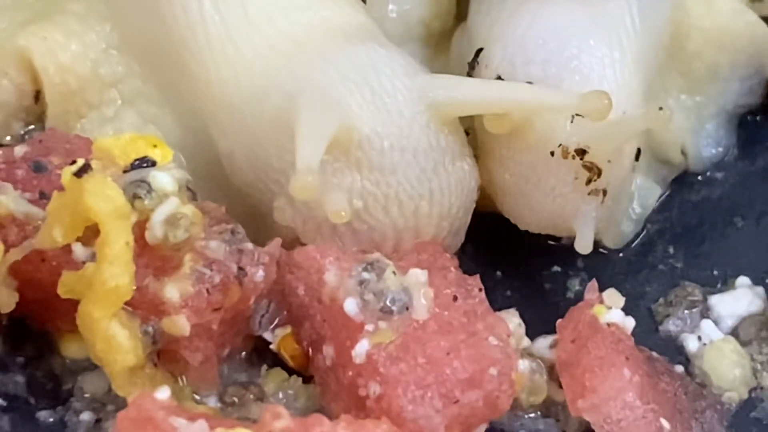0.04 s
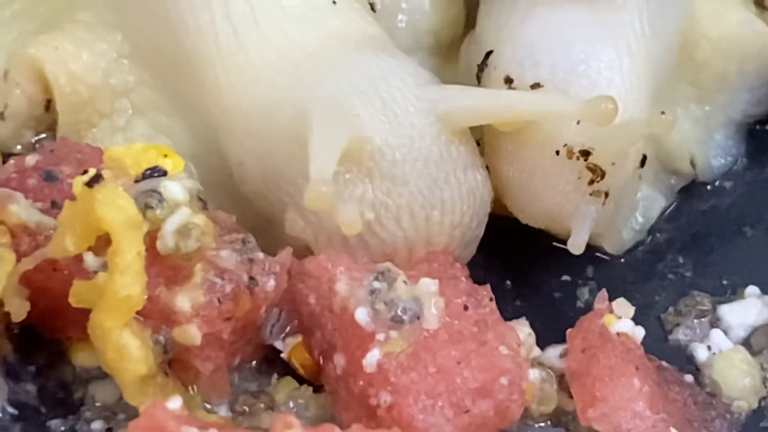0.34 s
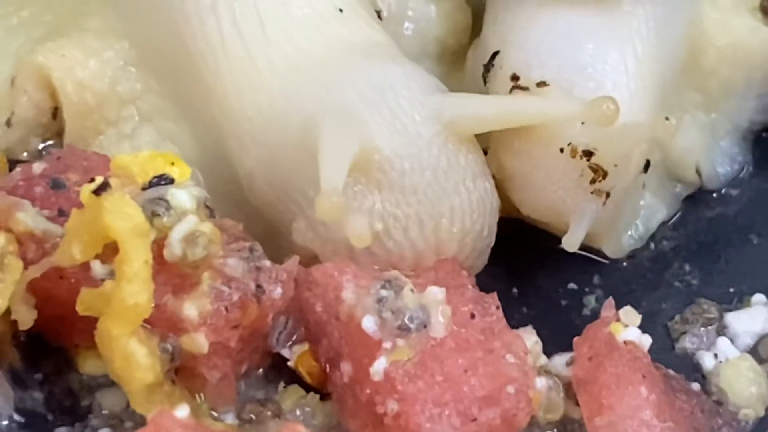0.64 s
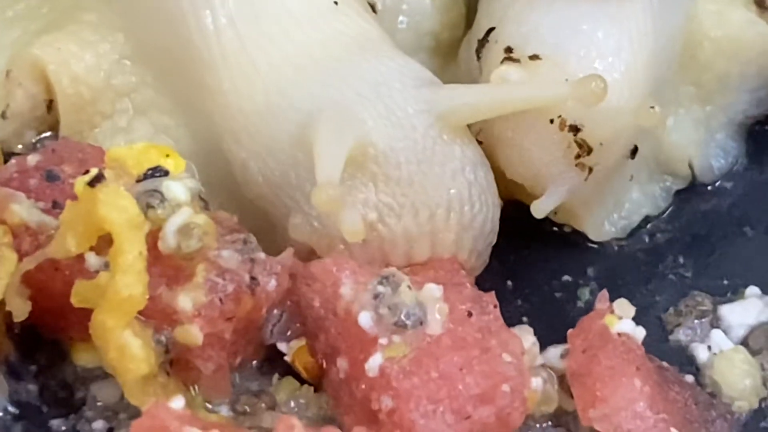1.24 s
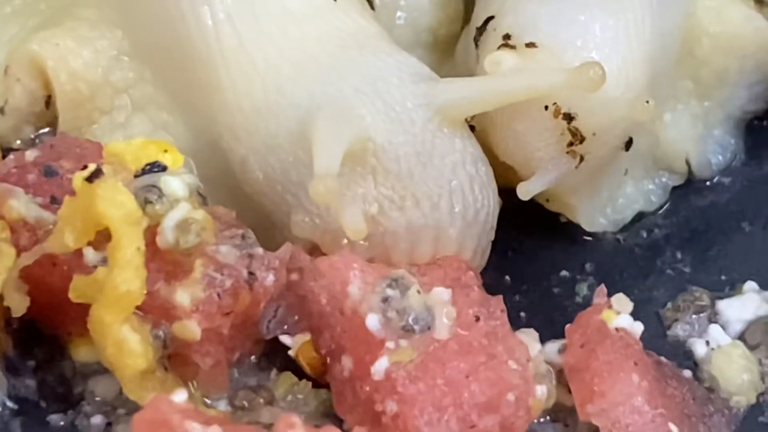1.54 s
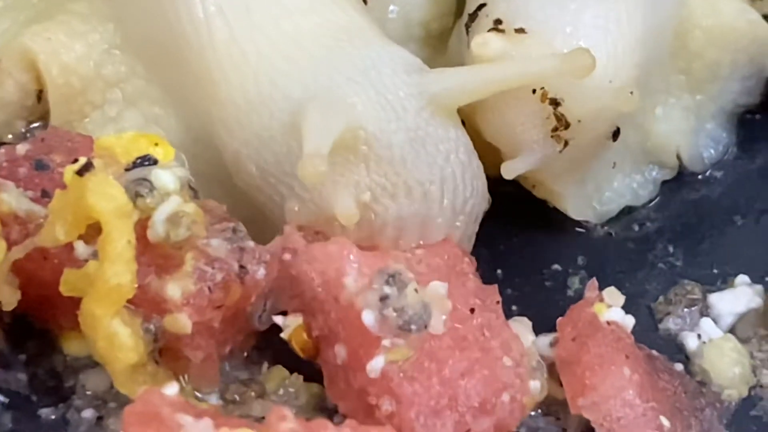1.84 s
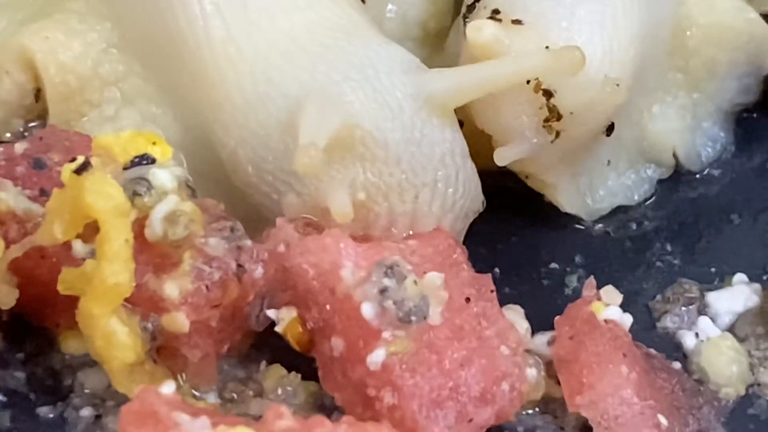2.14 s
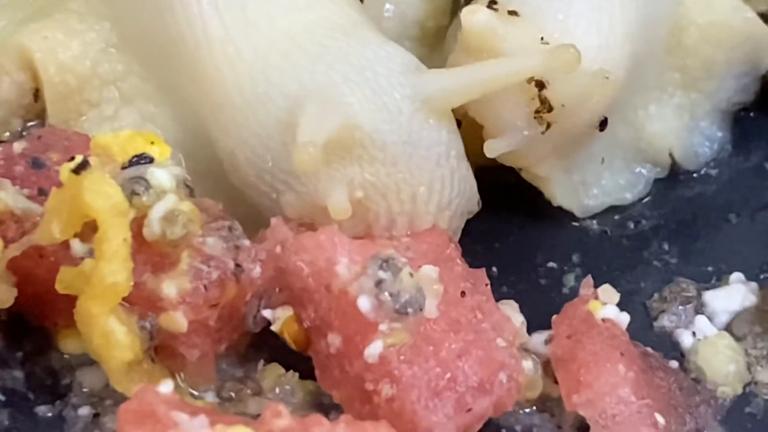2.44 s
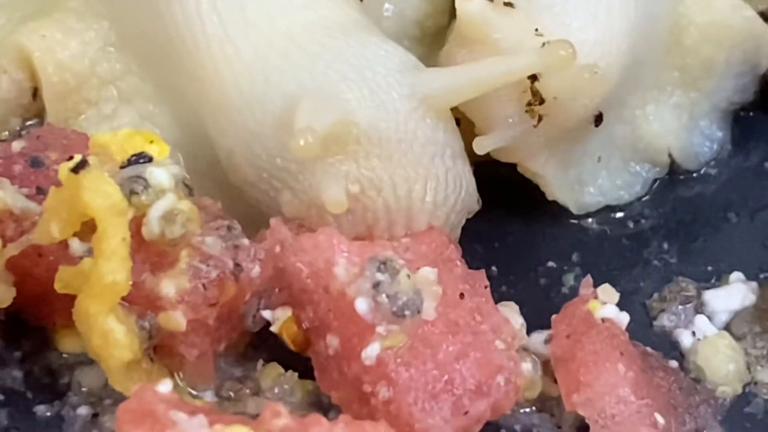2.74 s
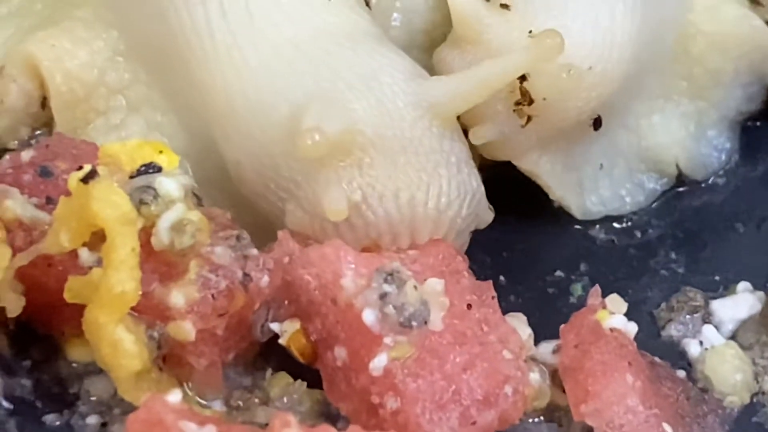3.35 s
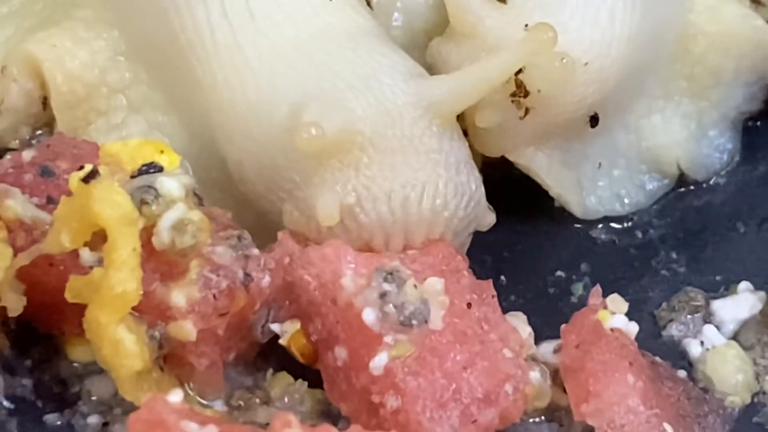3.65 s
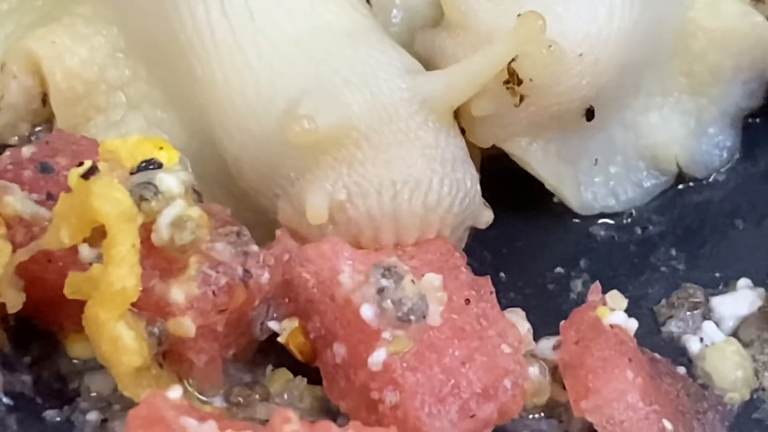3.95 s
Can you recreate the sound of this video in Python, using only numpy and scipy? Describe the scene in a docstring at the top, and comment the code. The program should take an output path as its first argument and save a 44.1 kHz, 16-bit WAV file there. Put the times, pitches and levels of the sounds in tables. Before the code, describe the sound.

A snail rasps at soft food in tiny ticks, with one wet plop over room hum.

```python
"""Snail feeding, close up

A snail rasps at soft food close to the microphone: its toothed tongue drags and snaps free in tiny
bright ticks, and the wet film sizzles. One wet plop is followed by a soft rub of its body on the left.
Behind it two motors throb against the mains hum, over dull room noise and faint microphone hiss."""
import sys
import numpy as np
from scipy import signal
from scipy.fft import rfft, irfft
from scipy.io import wavfile
from scipy.ndimage import uniform_filter1d

SR = 44100
rng = np.random.default_rng(int(sys.argv[2]) if len(sys.argv) > 2 else 0)


def store_wav(level_fs):
    """Save 16-bit WAV to argv[1]."""
    pcm = np.round(np.clip(np.atleast_2d(level_fs), -1, 1) * 32767)
    wavfile.write(sys.argv[1], SR, pcm.T.astype(np.int16))


N = 176400
T = np.arange(N) / SR
F = np.maximum(np.arange(N // 2 + 1) * SR / N, 1)


def undb(db):
    """Decibels to gain."""
    return 10 ** (np.asarray(db) / 20)


def level(x, db):
    """Set the rms level."""
    return x * undb(db) / np.sqrt(np.mean(x ** 2))


def noise():
    """White noise."""
    return rng.standard_normal(N)


def colour(x, points, turn=1):
    """Filter by (frequency [Hz], gain [dB]) points; turn=1j adds a quarter cycle at all frequencies."""
    hz, db = np.array(points).T
    gain = undb(np.interp(np.log(F), np.log(hz), db))
    return irfft(rfft(x) * turn * gain, N)


def ring(x, modes):
    """Steep resonances (centre [Hz], width [Hz], gain [dB]) that keep the power of white noise."""
    response = sum(undb(db) / (1 + 1j * (F / hz - hz / F) * hz / (1.03 * width)) ** 2
                   for hz, width, db in modes)
    return irfft(rfft(x) * response / np.sqrt(np.mean(abs(response) ** 2)), N)


def lowpass(x, hz, order=4):
    """Smooth treble cut."""
    return signal.sosfilt(signal.butter(order, hz, fs=SR, output="sos"), x)


def wander(per_s):
    """Smooth random drift with an rms of one."""
    hold = int(SR / per_s)
    steps = np.repeat(rng.standard_normal(N // hold + 1), hold)
    return level(uniform_filter1d(uniform_filter1d(steps, hold), hold)[:N], 0)


def stereo(mid, side=0, pan_db=0):
    """Left and right from mid, side and balance; positive pan is left."""
    return np.array([(mid + side) * undb(pan_db / 2), (mid - side) * undb(-pan_db / 2)])


def swell(start, length, attack, release):
    """Soft attack, hold, soft release, in seconds."""
    return (1 + np.tanh(2 * (T - start) / attack)) * (1 - np.tanh(2 * (T - start - length) / release)) / 4


# Motor and mains lines in the background (frequency [Hz], rms level at 0 dB of HUM_GAIN [dB])
HUM_LINES = [(48.47, -49), (59.37, -55), (96.96, -49), (100.04, -50), (145.4, -68), (194.5, -73),
             (283.5, -67.5)]
# Slow dip and rise of the whole hum (time [s], gain [dB])
HUM_GAIN = [(0, 2), (.35, -3), (.7, -4.5), (.95, 1), (2.5, 1), (4, 2)]
# Thin motor whine (frequency [Hz], rms level [dB])
WHINE_LINES = [(1977, -82), (2038, -86), (2410, -88), (2504, -89.5)]

def motors(in_step_s=0.98):
    """Behind the snail, motor and mains lines beat against each other under a wavering whine."""
    gain_db = np.interp(T, *np.array(HUM_GAIN).T)
    hum = sum(np.cos(2 * np.pi * hz * (T - in_step_s)) * undb(db + gain_db) for hz, db in HUM_LINES)
    whine = np.zeros(N)
    for hz, db in WHINE_LINES:
        phase = 2 * np.pi * np.cumsum(hz + 2 * wander(per_s=8)) / SR
        whine += np.sin(phase) * undb(db + 2 * wander(per_s=5))
    return stereo(np.sqrt(2) * (hum + whine))


# Spectra of the room tone, mid and side, and of its rumble (frequency [Hz], relative level [dB])
ROOM_MID = [(76, -44.5), (130, 0.5), (154, 3), (174, -1), (196, -2.5), (255, -4), (288, -1.5), (375, -6.5),
            (406, -4.5), (502, -11.5), (581, -9.5), (681, -12.5), (830, -13.5), (899, -15), (1220, -19.5),
            (1360, -19.5), (1670, -17.5), (1890, -22.5), (2040, -19), (2300, -23.5), (2490, -30),
            (2770, -34), (3080, -35), (4000, -54), (6780, -120)]
ROOM_SIDE = [(18, -41), (30, -18.5), (53, -1.5), (103, -8.5), (214, -15), (250, -18), (286, -14.5),
             (472, -14), (510, -15.5), (1930, -24.5), (3000, -48.5), (3900, -49.5), (6600, -120)]
RUMBLE = [(12, -24), (24, -15.5), (40, -4), (58, 5.5), (78, -5.5), (118, -3), (140, -12), (200, -39),
          (600, -120)]
# Lean of the room tone at the microphone (frequency [Hz], left over right [dB])
ROOM_BALANCE = [(200, 0.5), (450, 3.5), (700, 1.5), (950, 5), (1250, 1), (1700, 6), (2300, 1), (2800, 0)]

def room():
    """Wide, dull room tone that leans to the left, with a rumble in the centre."""
    mid = level(colour(noise(), ROOM_MID), -54)
    side = level(colour(noise(), ROOM_SIDE), -58.5)
    left = colour(mid + side, [(hz, db / 2) for hz, db in ROOM_BALANCE])
    right = colour(mid - side, [(hz, -db / 2) for hz, db in ROOM_BALANCE])
    rumble = level(colour(noise(), RUMBLE), -47.5)
    return lowpass(np.array([left, right]), hz=3540, order=10) + stereo(rumble)


# Self-noise of the microphone, mid and side (frequency [Hz], relative level [dB])
HISS_MID = [(2600, -21.5), (3300, 12), (3800, 1.5), (4500, -2.5), (6000, -3), (7700, -7), (8550, -16.5),
            (9300, -8), (10100, -3), (11200, -10.5), (12000, -19), (13200, -29.5)]
HISS_SIDE = [(4500, -46.5), (6200, -27), (7500, -1), (8600, 7), (10000, -9.5), (11500, 5.5), (12500, 0),
             (13300, -22)]

def hiss():
    """One faint microphone hiss, shifted in phase between the channels."""
    source = noise()
    mid = level(colour(source, HISS_MID), -84)
    side = level(colour(source, HISS_SIDE, turn=1j), -95.5)
    return stereo(mid, side)


# Drags of the tongue, close up (start [s], length [s], body level [dB], treble over body [dB])
TONGUE_DRAGS = [(1.024, 0.047, -81, -0.5), (1.613, 0.072, -81.5, -3.5), (1.724, 0.057, -81.5, -4.5),
                (1.783, 0.07, -81, -8), (1.855, .045, -85, 0), (1.951, .10, -76.5, -4),
                (2.055, 0.18, -88, -13), (2.382, .045, -89, 6)]
# Teeth snapping free (time [s], relative level [dB], treble over body [dB], crunch over body [dB])
TOOTH_SNAPS = [(1.3246, -84, 5, -5), (1.3954, -78, -9, -8), (1.5474, -84, -8, 2), (1.6270, -69, 2, 1.5),
               (1.6449, -73, -3, -5), (1.6518, -72, -6, 0), (1.6668, -76, -5, -6), (1.7357, -76, -1, -1),
               (1.7455, -62, -6, -2), (1.766, -64, -8, -5), (1.7983, -73, -14, -12),
               (1.8054, -60.5, -20, -18), (1.824, -59, -10, -12), (1.8329, -71, -12, -9),
               (1.851, -70, 0, -14), (1.904, -81, 13, -2), (1.916, -67, -4, -16), (1.9575, -69, -12, -16),
               (1.9622, -53, -8.5, -5), (1.9756, -72, -5, -10), (1.9828, -73, 4, -3), (1.99, -62, -4, -17),
               (2.0012, -63.5, -6, -14), (2.0045, -65, -6, -6), (2.0192, -64, -10, -14),
               (2.0206, -60.5, -6, -12), (2.0295, -66, -13, -8), (2.0358, -69, -4, -8),
               (2.042, -65, -9, -13), (2.066, -66, -11, -13), (2.1119, -70, -13, -12),
               (2.1571, -68, -13, -16), (2.1654, -65, -11, -15), (2.1958, -71, -8, -10),
               (2.3255, -75, -8, -16), (2.3655, -70, 1, -13), (2.395, -67, 11, -9), (3.9808, -78.5, 4, -10)]
# Low, middle and high resonances of the rasp (centre [Hz], width [Hz], relative gain [dB])
CRUNCH_MODES = [(3580, 980, 2), (5000, 1000, 2)]
BODY_MODES = [(6150, 770, 0.23), (7200, 980, -1.2)]
TREBLE_MODES = [(9750, 1500, 3), (10900, 640, -6.5)]
# Stereo width of the rasp at the microphone (frequency [Hz], side over mid [dB])
RASP_SIDE = [(3000, -21), (6000, -18.5), (7800, -2), (8550, 9), (9300, -1), (10000, -9), (12000, 5.5)]

def rasp(grains_per_s=2000, grain_spread_db=3, drag_edge_s=0.023, snap_boost_db=17, trail_decay_s=0.003):
    """The tongue drags in dense grains and its teeth snap free; both ring the same bright resonances."""
    impulses = (rng.random(N) < grains_per_s / SR) * noise()
    grains = level(impulses * undb(grain_spread_db * wander(per_s=400)), 0)
    crunch, body, treble = np.zeros((3, N))
    for start, length, db, treble_db in TONGUE_DRAGS:
        drag = grains * swell(start, length, drag_edge_s, drag_edge_s) * undb(db)
        crunch += drag * undb(-4.5)
        body += drag
        treble += drag * undb(treble_db)
    grit = noise() * undb(-26)  # trails each click, well below its peak
    for start, db, treble_db, crunch_db in TOOTH_SNAPS:
        click = np.arange(N) == int(start * SR)
        trail = grit * (T > start) * np.exp(-abs(T - start) / trail_decay_s)
        snap = (click + trail) * undb(db + snap_boost_db)
        crunch += snap * undb(crunch_db)
        body += snap
        treble += snap * undb(treble_db)
    mid = microphone(ring(crunch, CRUNCH_MODES) + ring(body, BODY_MODES) + ring(treble, TREBLE_MODES))
    return stereo(mid, colour(mid, RASP_SIDE, turn=1j))


def microphone(x):
    """The close microphone gives the rasp one narrow notch and a steep treble cut."""
    notched = signal.lfilter(*signal.iirnotch(8500, Q=12, fs=SR), x)
    return lowpass(notched, hz=11500, order=16)


# Slides of the wet body, mostly left of the microphone
# (start [s], length [s], release [s], level [dB], centre [Hz], width [Hz], left over right [dB])
BODY_RUBS = [(1.03, 0.069, .08, -82.5, 4600, 2600, -1), (1.119, 0.06, .05, -61, 880, 150, 8),
             (1.125, 0.06, .12, -64.5, 1730, 800, 0), (1.15, 0.044, .05, -52.5, 345, 210, 2),
             (1.112, 0.1, .16, -77.5, 3300, 2000, -1)]

def rubs(attack_s=0.015):
    """The wet body slides: soft, uneven bands of noise around the plop that die away slowly."""
    slides = np.zeros((2, N))
    for start, length, release, db, hz, width, pan_db in BODY_RUBS:
        friction = ring(noise(), [(hz, width, 0)])
        envelope = swell(start, length, attack_s, release) * undb(db + 2 * wander(per_s=69.35))
        slides += stereo(friction * envelope, pan_db=pan_db)
    return lowpass(slides, hz=7100)


# Sizzles of the wet film, dead centre (start [s], length [s], level [dB], centre [Hz])
FILM_SIZZLES = [(1.032, .05, -98, 13000), (1.718, .048, -96, 13400), (1.7345, .003, -80, 13500),
                (1.858, .04, -98, 13100), (1.9025, .003, -85, 13000), (1.9612, .003, -81, 12700)]

def fizz(width_hz=1200):
    """The wet film parts with brief, very high sizzles, each at its own pitch."""
    sizzles = np.zeros(N)
    for start, length, db, hz in FILM_SIZZLES:
        edge_s = 0.4 * length
        burst = noise() * swell(start, length, edge_s, edge_s)
        sizzles += ring(burst, [(hz, width_hz, 0)]) * undb(db)
    return stereo(sizzles)


def plop(start_s=1.0853, start_hz=1810, end_hz=354, fall_s=0.0012, rise_s=0.00057, decay_s=0.0038):
    """A wet contact lets go just right of centre: a few soft cycles that fall fast in pitch."""
    age = np.maximum(T - start_s, 0)
    hz = end_hz + (start_hz - end_hz) * np.exp(-age / fall_s)
    tone = np.sin(2 * np.pi * np.cumsum(hz * (age > 0)) / SR)
    envelope = (1 - np.exp(-age / rise_s)) * np.exp(-age / decay_s)
    return stereo(lowpass(tone * envelope * undb(-33), hz=2440), pan_db=-4)


def scene():
    """The room behind, the snail close in front of the microphone."""
    return motors() + room() + hiss() + rasp() + rubs() + fizz() + plop()


def record(dry):
    """The recorder cuts steeply above 14.5 kHz."""
    return signal.sosfilt(signal.ellip(8, .2, 70, 14500, fs=SR, output="sos"), dry)


dry = scene()
out = record(dry)
store_wav(out)
```